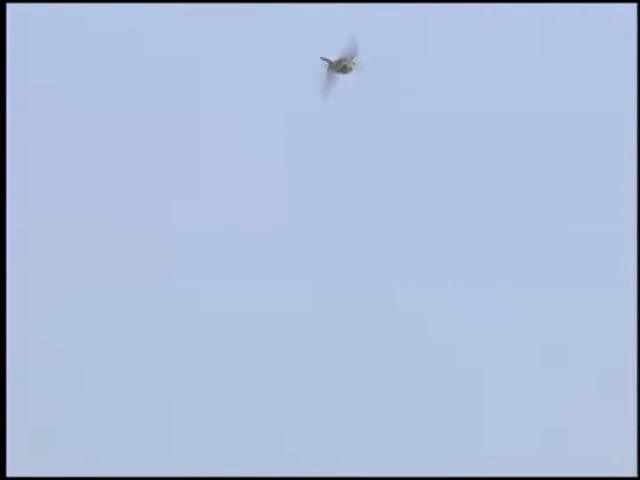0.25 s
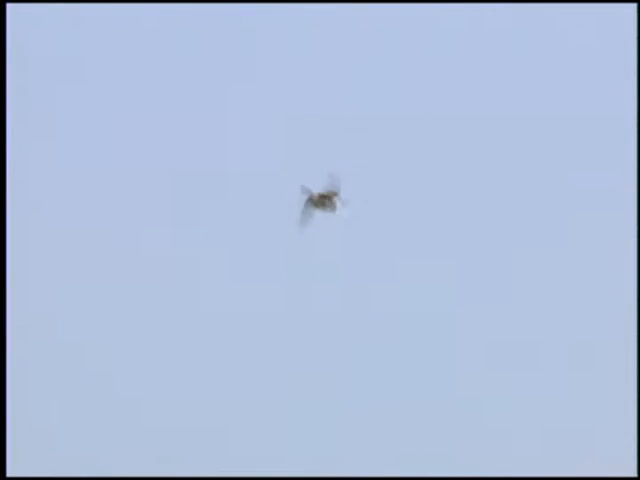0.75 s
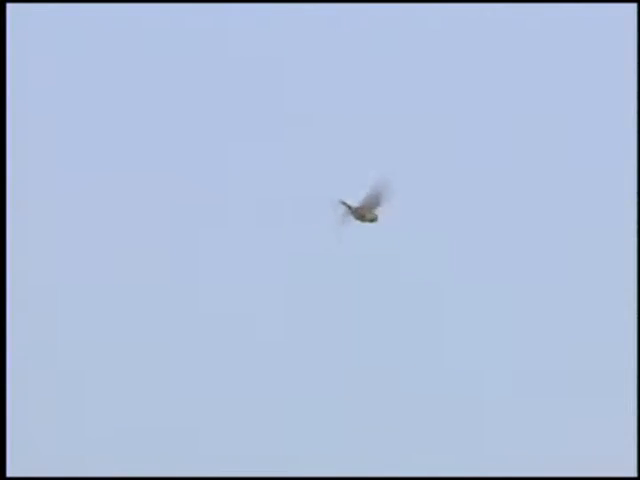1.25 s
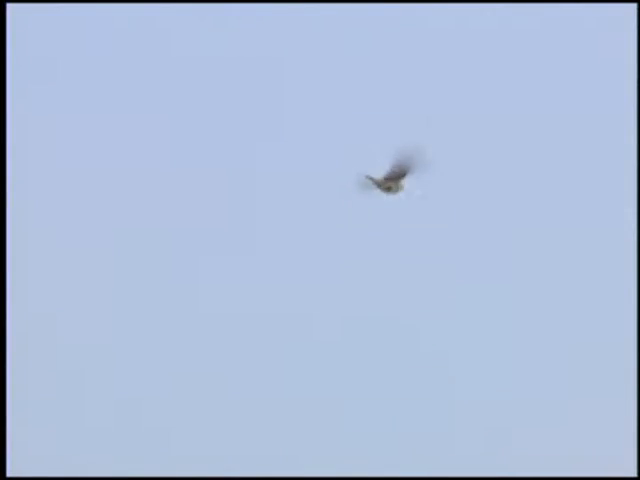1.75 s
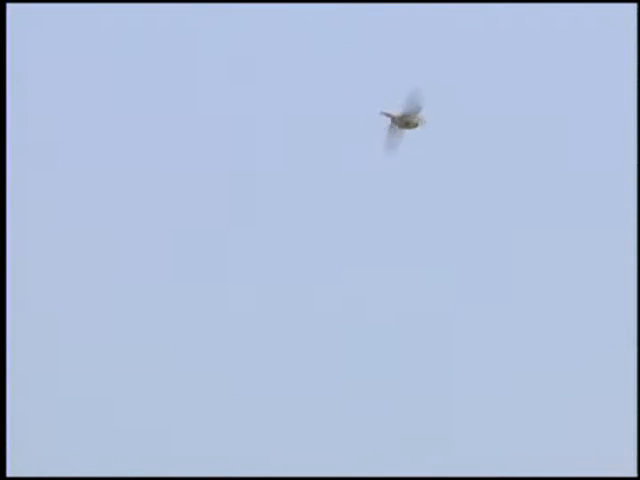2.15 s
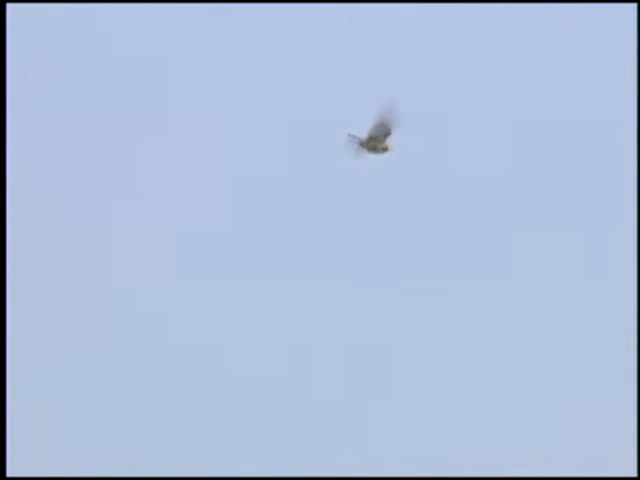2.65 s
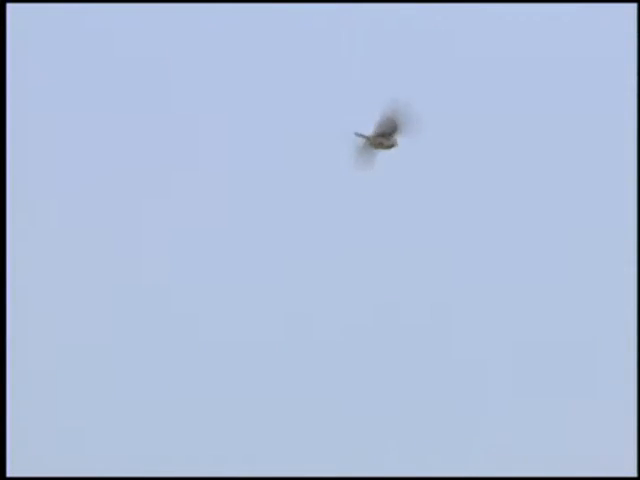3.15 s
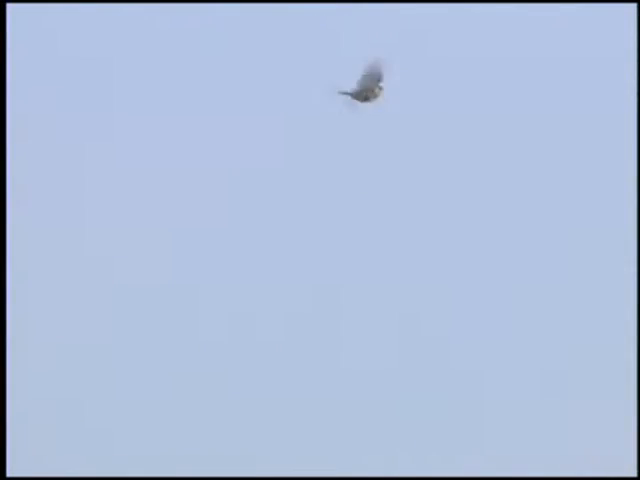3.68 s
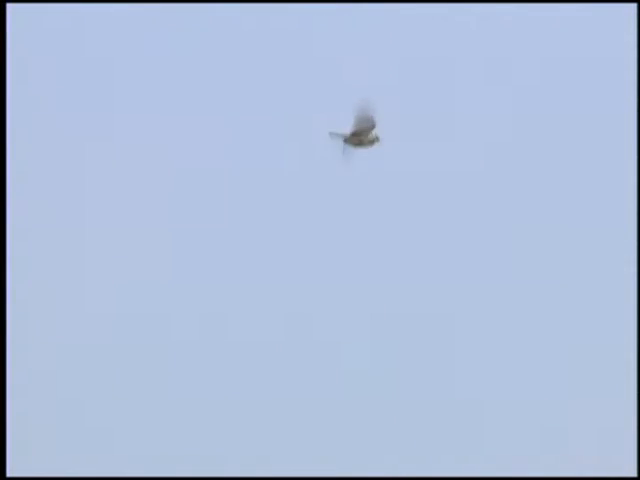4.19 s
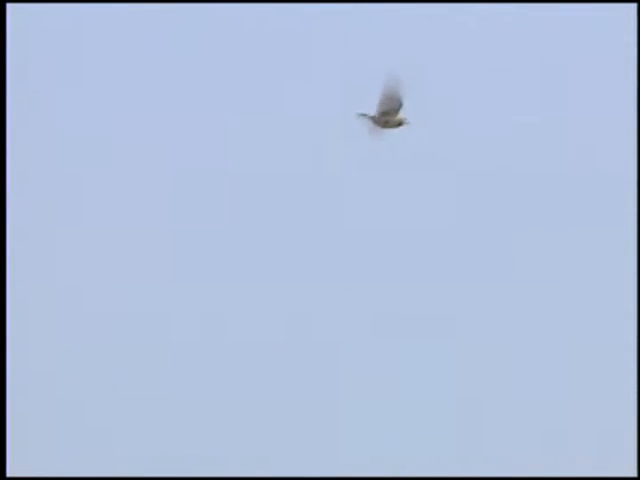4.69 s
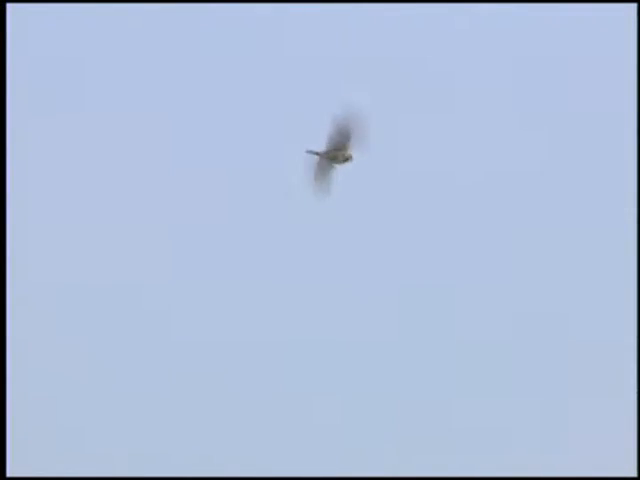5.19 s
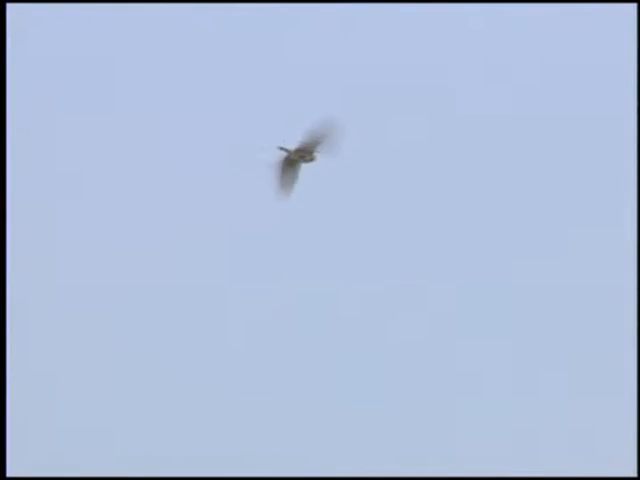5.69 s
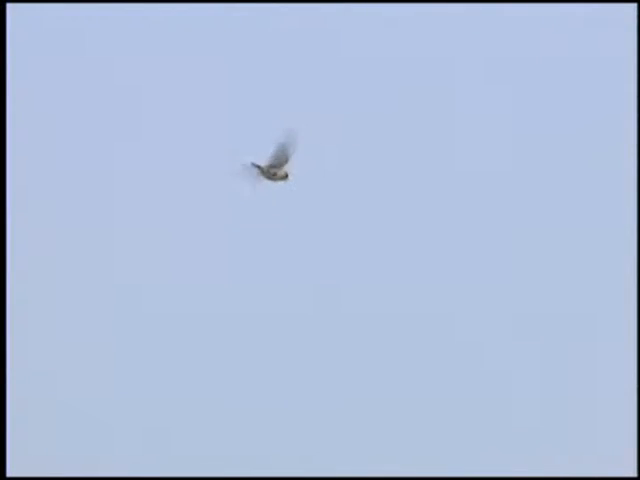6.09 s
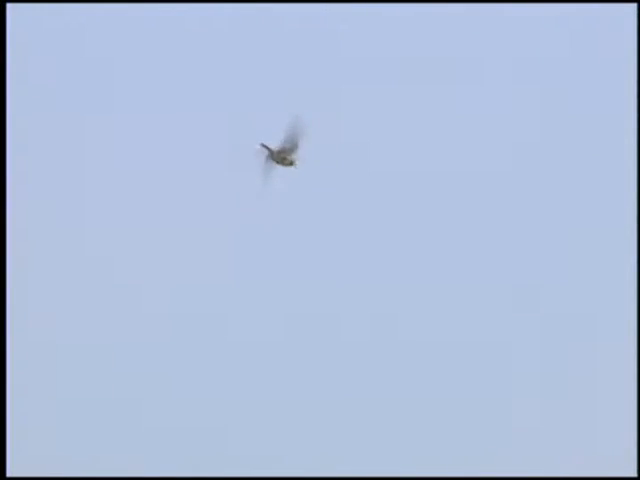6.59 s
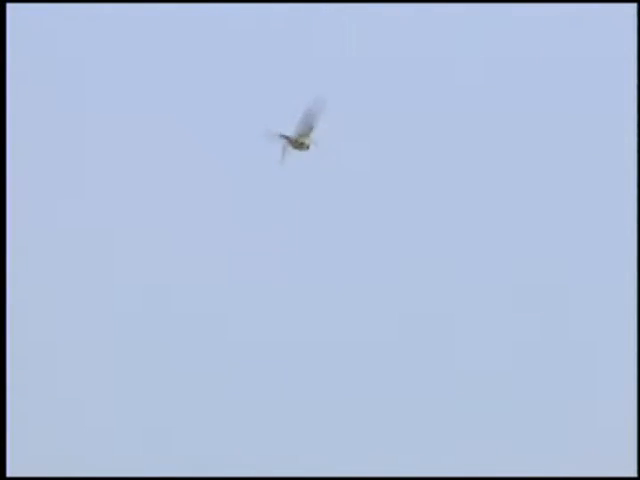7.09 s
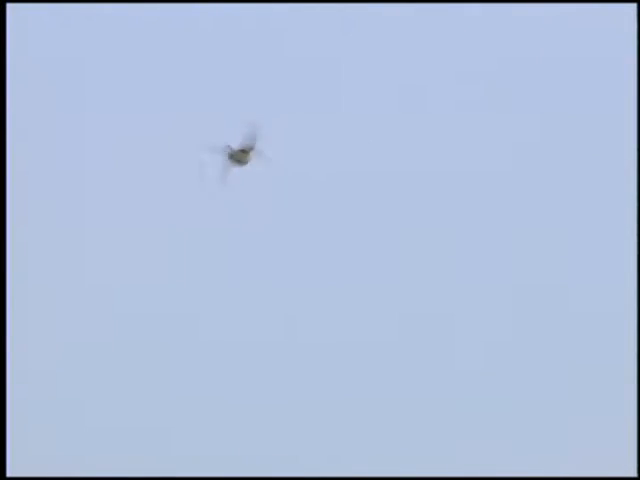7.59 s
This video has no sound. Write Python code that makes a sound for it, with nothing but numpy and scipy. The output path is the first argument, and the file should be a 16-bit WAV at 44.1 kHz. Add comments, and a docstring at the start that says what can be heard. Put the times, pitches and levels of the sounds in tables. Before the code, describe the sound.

A skylark sings as it flies over open fields. It opens with two high, whistled twitters, then repeats one quick phrase of falling swoops, chips and a buzzy trill, swelling and fading a little. Low wind rumbles on the microphone, gusting hardest just past the middle. Faint distant birds chirp and whistle, soft rustles come from close by, and a thin, faint camera whine runs underneath.

```python
"""From the start, wind rumbles on the microphone, a camera whines thinly and birds call far off.
A skylark, flying over open fields, whistles two twitters while soft rustles begin close by.
From about 2 s it repeats one phrase of swoops, chips and a buzz, which is a very fast trill.
A faint hum swells and fades midway, and the wind gusts hard near 5 s. Toward the end a distant
bird gives three arching whistles while the lark sings on."""
import sys
import numpy as np
from scipy import signal
from scipy.fft import rfft, irfft
from scipy.io import wavfile
from scipy.ndimage import uniform_filter1d

SR = 44100
rng = np.random.default_rng(int(sys.argv[2]) if len(sys.argv) > 2 else 0)


def generate_wav(signal):
    """Clip the signal to [-1, 1] and save it as 16-bit WAV at the path in sys.argv[1]."""
    frames = np.transpose(np.atleast_2d(signal))
    scaled = np.clip(frames, -1, 1) * 32767
    pcm = np.round(scaled).astype(np.int16)
    wavfile.write(sys.argv[1], SR, pcm)


N = 345744
TIME = np.arange(N) / SR

# Levels in the tables are relative: the functions turn them up or down.
# Tones of the camera's whine and of the distant hum: pitch_hz, level_db
WHINE_TONES = [(7865, -103), (15202, -115), (15725, -88)]
HUM_TONE = [(753.7, -83)]
# Strength of the gusts on the microphone and of the breeze over the fields: time_s, level_db
GUSTS = [(0.0, -35), (0.08, -45.5), (0.81, -40), (1.18, -52), (1.22, -42), (1.29, -48.5), (1.4, -36),
         (1.46, -48), (1.81, -42.5), (1.83, -40), (2.16, -49), (3.78, -53), (4.02, -44.5), (4.17, -53),
         (4.23, -44), (4.65, -44), (4.76, -34), (4.95, -43.5), (5.0, -31), (5.17, -45), (5.57, -40.5),
         (5.63, -47.5), (5.7, -34), (5.76, -39.5), (6.72, -35), (6.94, -46), (7.21, -39), (7.62, -41.5),
         (7.75, -34), (7.84, -37)]
BREEZE = [(0.0, -70.5), (0.87, -71), (1.07, -73), (2.05, -69), (6.94, -69.5), (7.44, -66), (7.84, -71)]
# Bass-to-treble balance of big air swirls, small swirls, breeze and rustles: frequency_hz, level_db
RUMBLE_COLOUR = [(12, -10.5), (25, 1), (40, 0), (70, -3.5), (100, -7), (140, -22), (200, -30.5),
                 (300, -41.5), (600, -85.5), (2000, -140)]
FLUTTER_COLOUR = [(40, -9), (110, 4.5), (150, 0.5), (200, -7), (260, -17), (400, -27), (2000, -100)]
BREEZE_COLOUR = [(80, -4), (180, 9), (300, 6), (450, 4), (750, -1), (1000, -5), (1500, -10.5),
                 (2200, -18.5), (4000, -25), (7000, -35), (12000, -55.5)]
RUSTLE_COLOUR = [(300, -7), (650, 7), (1000, 2.5), (1500, 2.5), (2200, -1.5), (2700, -3.5), (3500, -13),
                 (7000, -35), (12000, -62.5)]
# Soft rustles nearby: start_s, level_db, rise_s, fade_s (time to drop by 60 dB)
RUSTLES = [(0.76, -65, .0044, 0.079), (.996, -67.5, .003, 0.12), (1.195, -68.5, .003, 0.11),
           (1.45, -71.5, .006, .17), (2.140, -67, 0.013, 0.18), (3.101, -65, 0.014, 0.47),
           (3.558, -60, 0.0068, 0.34), (5.069, -69, 0.008, 0.24), (5.380, -67, 0.023, 0.17),
           (5.973, -66.5, .006, 0.54), (6.461, -65, .009, 0.37)]

# How each kind of bird note glides: progress (0 to 1), pitch_hz, level_db
RISE_SHAPE = [(0, 5360, -7.5), (.35, 5510, -2), (0.698, 6100, -4), (1, 6850, -5.5)]
SWOOP_SHAPE = [(0, 7110, -20), (0.099, 6560, -10.5), (0.352, 5465, -3), (.55, 4700, -3.5),
               (0.749, 4200, 1.5), (.92, 3850, 0.5), (1.001, 3820, -11.5)]
PEAK_SHAPE = [(0, 4100, -14), (.2, 4800, -6), (.42, 5330, -6), (.57, 4500, -1), (.8, 4020, 1),
              (1, 3880, -3)]
CHIP_SHAPE = [(0, 3000, -8), (.5, 3100, 1), (1, 2830, -9.5)]
CHURR_SHAPE = [(0, 3530, 1), (.3, 3520, 3), (.48, 3440, 1.5), (.53, 3210, 1.5), (.62, 3130, 1),
               (.67, 2620, -8), (.8, 2470, -8), (1, 2050, -15)]
FLICK_SHAPE = [(0, 5700, -7), (.25, 5080, 2.5), (.6, 4780, 1), (1, 3750, 5)]
BUZZ_SHAPE = [(0, 5450, -7), (.04, 4950, -1), (.11, 4700, -2), (.25, 4540, -.5), (.55, 4500, 0),
              (.85, 4380, -.5), (.94, 4400, -4), (1, 4400, -14)]
SLUR_SHAPE = [(0, 5000, -23), (.08, 5550, -15), (.15, 7200, -28), (.21, 5600, -14), (.3, 5200, -9.5),
              (.42, 4930, -10), (.51, 4400, -7), (.59, 3680, -4), (.72, 3430, -5), (.93, 3390, -7),
              (1, 3420, -20)]
TWEET_SHAPE = [(0, 3210, -4), (.25, 4320, -0.5), (.33, 4360, -13), (.42, 4540, 4), (0.701, 4000, 1),
               (1, 3420, 3.5)]
LILT_SHAPE = [(0, 2960, -14.5), (.25, 3100, -7.5), (.55, 3700, -0.5), (.67, 3140, -11), (0.751, 3190, -35),
              (.87, 3810, 0), (1, 3720, 7)]
PURR_SHAPE = [(0, 2880, -12), (.45, 2900, -2), (1, 2670, -8)]
RATTLE_SHAPE = [(0, 4550, -3), (.15, 4210, -6), (.6, 4110, -4), (1, 3970, -9)]
JINGLE_SHAPE = [(0, 4590, -9), (.2, 4890, -1), (0.701, 4540, -1), (.85, 4670, 3.5), (1, 4495, -23)]
WHISTLE_SHAPE = [(0, 3300, -8), (.3, 4000, -3), (.55, 4290, 0), (.8, 4370, 0), (1, 4320, -3)]
FALL_SHAPE = [(0, 4600, -5), (0.249, 4880, 0.5), (.6, 4480, -1.5), (1, 3970, -5)]
BOW_SHAPE = [(0, 3100, -1), (.25, 3300, -1), (.48, 3430, 4), (.65, 3100, 4), (1, 2620, -11)]
# Figures, the quick wiggles that repeat in a trill: progress (0 to 1), pitch_offset_hz, level_db
PLAIN = [(0, 0, 1), (1, 0.0049, -4)]
ARCH = [(0, -480, -3), (.2, 0, 0), (.5, 210, 0), (.8, 0, 0), (1, -480, -3)]
ZIGZAG = [(0, -1000, -7), (.09, -650, -5), (.22, 740, -6), (.35, 50, -.5), (.64, -30, .5), (.78, 380, -2.5),
          (.92, -620, -5), (1, -1000, -7)]
HORNS = [(0, -800, -12), (.15, 600, -3), (.3, -100, -3), (.55, -350, -2), (.7, 50, -1), (.85, 850, 0),
         (1, -800, -12)]

# Rising whistles and falling calls of distant birds: start_s, level_db, length_s, pitch_factor
FAR_WHISTLES = [(.15, -89, .13, 1.29), (.488, -84, 0.077, 0.94), (.755, -79, .08, .99),
                (1.68, -83, .04, 1.15)]
FAR_CALLS = [(1.345, -83, 0.026, 0.86), (1.722, -82, .028, 1.18), (3.742, -72, 0.011, 1.03),
             (4.718, -76, 0.018, 1.05), (4.80, -74.5, 0.014, 0.59), (4.918, -79, .014, .87),
             (4.938, -78, .016, .95), (5.425, -77.5, .014, 0.73), (5.90, -80, 0.018, 0.91)]
# The lark's notes by name: shape, figure, count (of wiggles), slowing, swing (wiggle size factor)
LARK_NOTES = { "rise": dict(shape=RISE_SHAPE), "swoop": dict(shape=SWOOP_SHAPE),
              "peak": dict(shape=PEAK_SHAPE), "flick": dict(shape=FLICK_SHAPE),
              "tweet": dict(shape=TWEET_SHAPE), "lilt": dict(shape=LILT_SHAPE),
              "slur": dict(shape=SLUR_SHAPE), "whistle": dict(shape=WHISTLE_SHAPE),
              "chip": dict(shape=CHIP_SHAPE, figure=ARCH),
              "stutter": dict(shape=CHIP_SHAPE, figure=ARCH, count=3.3),
              "purr": dict(shape=PURR_SHAPE, figure=ARCH, count=6.7),
              "churr": dict(shape=CHURR_SHAPE, figure=ARCH, count=8),
              "rattle": dict(shape=RATTLE_SHAPE, figure=ZIGZAG, count=6.6, swing=0.88),
              "jingle": dict(shape=JINGLE_SHAPE, figure=HORNS, count=6),
              "buzz": dict(shape=BUZZ_SHAPE, figure=ZIGZAG, count=17, slowing=0.13)}
# The lark's three tunes: offset_s, note_name, level_db, length_s, pitch_factor
TWITTER = [(-.058, "purr", -69.5, 0.057, 0.98), (0, "tweet", -68, 0.034, 0.98),
           (.07, "whistle", -76, 0.014, .61), (.136, "lilt", -67, 0.053, 0.99),
           (.197, "flick", -76.5, 0.0078, 0.59), (.243, "flick", -75, .016, .91),
           (.266, "rattle", -64.5, .06, 1), (.329, "jingle", -69.5, 0.094, 0.98),
           (.469, "slur", -55.5, 0.11, 0.98), (.623, "slur", -55, 0.11, 1)]
LINK = [(.829, "stutter", -69.5, 0.03, 0.96), (.865, "stutter", -70.5, 0.022, 1),
        (.924, "tweet", -71.5, 0.031, 1), (.957, "whistle", -70, 0.025, .71),
        (.982, "tweet", -70, .025, .87), (1.01, "flick", -79, 0.0076, .55)]
PHRASE = [(-.033, "rise", -67, .02, 1), (0, "swoop", -62, 0.063, 0.99), (.098, "rise", -67, .02, 1),
          (.1315, "swoop", -61.5, .062, 1), (.232, "peak", -60.5, .03, 1),
          (.2705, "chip", -64.5, .009, 0.98), (.29, "chip", -62.5, .009, 1), (.309, "churr", -65, .053, 1),
          (.4085, "flick", -69.5, .015, 1)]
# Each time the twitter is sung: start_s, stretch_factor (above 1 spreads the notes out)
TWITTER_REPEATS = [(.050, 1.0), (1.135, .99)]
# Each time the main phrase is sung: start_s, stretch_factor, buzz_length_s, buzz_pitch_factor
PHRASE_REPEATS = [(1.938, 1, .18, 1), (2.66, 0.98, .18, 1), (3.3702, 1.003, .18, 1), (4.085, 1, 0.2, 0.99),
                  (4.814, 0.99, 0.19, 1), (5.531, 1.034, 0.18, 0.99), (6.271, 1.008, .193, 0.99),
                  (7.006, 1.018, 0.2, 0.97), (7.751, 1, .19, 0.96)]
# The song swells and fades as the lark turns in flight: time_s, level_db
SONG_LOUDNESS = [(0, 2), (.7, 1.5), (1.1, -0.5), (1.8, -1.5), (2.3, 0), (3.4, .5), (3.9, -2), (4.9, 2.5),
                 (5.35, 0), (5.67, -6), (6.05, -6), (6.3, -1.5), (6.55, -3), (6.95, -2), (7.2, 0),
                 (7.8, -2.5)]


def gain_of(db):
    """Turns decibels into a number to multiply a sound by."""
    return 10 ** (np.asarray(db) / 20)


def evened(x):
    """Scales a signal so that its average power is 1."""
    return x / np.sqrt(np.mean(x ** 2) + 1e-20)


def along(rows, at):
    """Looks up places in a table's first column and reads the others, blending between rows."""
    place, *columns = np.transpose(rows)
    return [np.interp(at, np.sort(place), column) for column in columns]


def add(mix, start_s, sound):
    """Mixes a sound in at the given time, cutting off what falls outside."""
    at = round(start_s * SR)
    sound = sound[max(-at, 0):]
    part = mix[max(at, 0):][:len(sound)]
    part += sound[:len(part)]


def noise(colour):
    """Noise with the bass-to-treble balance of a colour table."""
    hz, db = np.transpose(colour)
    balance_db = np.interp(np.log(np.fft.rfftfreq(N, 1 / SR) + 1), np.log(hz + 1), db)
    return evened(irfft(rfft(rng.standard_normal(N)) * gain_of(balance_db), N))


def wander(samples, rate_hz):
    """A smooth random wobble about 1 in size; a higher rate makes it quicker."""
    padded = samples + SR // 4
    keep_slow = np.exp(-(np.fft.rfftfreq(padded, 1 / SR) / rate_hz) ** 2)
    return evened(irfft(rfft(rng.standard_normal(padded)) * keep_slow))[:samples]


def camera_whine(boost_db=4.5, drift=.0007, growth_db_per_s=0.43):
    """The camera's electronics give off thin, unsteady tones that slowly grow louder."""
    clock = TIME + np.cumsum(drift * wander(N, 27)) / SR
    tones = sum(gain_of(db) * np.sin(2 * np.pi * hz * clock) for hz, db in WHINE_TONES)
    waver = 1 + .18 * wander(N, 25)
    return gain_of(boost_db + growth_db_per_s * TIME) * tones * waver


def far_hum(boost_db=1.5, peak_s=3.4, width_s=1.4, drift_hz=7):
    """A faint, wavering hum drifts in from far away and fades."""
    hz, db = HUM_TONE[0]
    tone = np.sin(2 * np.pi * np.cumsum(hz + drift_hz * wander(N, 15)) / SR)
    waver_db = 2.5 * wander(N, 8)
    swell = np.exp(-.5 * ((TIME - peak_s) / width_s) ** 2)
    return tone * gain_of(db + boost_db + waver_db) * swell


def wind(flutter_db=-55, flutter_growth=1.275, breeze_boost_db=1, hiss_db=-89):
    """Swirls of air beat on the microphone; the open field adds a soft rush under a thin hiss."""
    gust_db = along(GUSTS, TIME)[0] + 1.4 * wander(N, 25)
    swirls = noise(RUMBLE_COLOUR)
    swirls /= np.sqrt(uniform_filter1d(swirls ** 2, size=5000))  # only the gusts set the slow swell
    rumble = swirls * gain_of(gust_db)
    # Strong, lasting gusts stir up small swirls, which sound brighter.
    lasting_db = uniform_filter1d(gust_db, size=SR // 4) - np.median(gust_db)
    flutter = noise(FLUTTER_COLOUR) * gain_of(flutter_db + flutter_growth * lasting_db)
    breeze_db = along(BREEZE, TIME)[0] + breeze_boost_db
    breeze = noise(BREEZE_COLOUR) * gain_of(breeze_db + 1.94 * wander(N, 13))
    return rumble + flutter + breeze + gain_of(hiss_db) * rng.standard_normal(N)


def rustles():
    """Something rustles close by: soft, grainy bursts of noise that swell and die away."""
    swell = np.zeros(N)
    t = TIME[:SR // 2]
    for start_s, db, rise_s, fade_s in RUSTLES:
        drop_db = 60 * np.maximum(t - rise_s, 0) / fade_s
        add(swell, start_s, np.minimum(t / rise_s, 1) * gain_of(db - drop_db))
    grain = gain_of(2.2 * wander(N, 300))
    return swell * evened(noise(RUSTLE_COLOUR) * grain)


def grass_scatter(sound, fade_s=0.41, tail_db=-17, treble_db_per_octave=9):
    """Grass throws back a weak, blurred echo; its thin blades scatter high notes best."""
    t = TIME[:SR // 2]
    onset = 1 - np.exp(-t / 0.0023)
    tail = rng.standard_normal(len(t)) * gain_of(-60 * t / fade_s) * onset
    octaves = np.log2(np.clip(np.fft.rfftfreq(len(t), 1 / SR), 2000, 7000) / 4500)
    tail = irfft(rfft(evened(tail)) * gain_of(tail_db + treble_db_per_octave * octaves), len(t))
    return signal.fftconvolve(sound, tail / np.sqrt(len(t)))[:N]


def ground_bounce(sound, delay_s=0.0082, echo_db=-19):
    """The soil returns one weak echo, which makes gliding notes ripple when mixed with them."""
    return gain_of(echo_db) * np.interp(TIME - delay_s, TIME, sound, left=0)


def bird_note(shape, db, length_s, pitch_factor=1, figure=PLAIN, count=1, slowing=0, swing=1):
    """A nearly pure tone glides along a shape; in a trill, a quick wiggle repeats on top."""
    progress = np.linspace(0, 1, max(int(length_s * SR), 64))
    samples = len(progress)
    glide_hz, glide_db = along(shape, progress)
    cycles = count * (progress + slowing * progress * (1 - progress))
    place_in_cycle = (cycles + .035 * wander(samples, 120)) % 1
    wiggle_hz, wiggle_db = uniform_filter1d(along(figure, place_in_cycle), size=20, axis=1)
    depth = np.clip(2 * cycles - .5, 0, 1) if figure is ZIGZAG else 1  # a buzz starts as a plain note
    hz = pitch_factor * glide_hz + depth * swing * wiggle_hz
    unsteady = 1 + .005 * wander(samples, 400)
    phase = 2 * np.pi * np.cumsum(hz * unsteady) / SR
    tone = np.sin(phase) + gain_of(-42) * np.sin(2 * phase)  # a faint overtone, one octave up
    from_edge_s = np.minimum(progress, 1 - progress) * length_s
    fades = np.sin(np.pi / 2 * np.clip(from_edge_s / .0018, 0, 1)) ** 2  # soft ends do not click
    flicker_db = 1.63 * wander(samples, 160)
    return np.sqrt(2) * tone * fades * gain_of(db + glide_db + depth * wiggle_db + flicker_db)


def far_birds(chirps=70, chirp_db=-87, spread_db=3):
    """Distant birds whistle and call at set times, with faint random chirps in between."""
    out = np.zeros(N)
    bows = [(6.83 + k * .381, -83.5, .125) for k in range(3)]  # arching whistles: start_s, db, length_s
    for calls, shape in [(FAR_WHISTLES, WHISTLE_SHAPE), (FAR_CALLS, FALL_SHAPE), (bows, BOW_SHAPE)]:
        for start_s, *settings in calls:
            add(out, start_s, bird_note(shape, *settings))
    shapes = [FALL_SHAPE, PEAK_SHAPE, TWEET_SHAPE, WHISTLE_SHAPE, LILT_SHAPE]
    for k, (when, loud, long, high) in enumerate(rng.random((chirps, 4))):
        shape = shapes[k % len(shapes)]
        db = chirp_db + spread_db * (2 * loud - 1)
        chirp = bird_note(shape, db, length_s=.011 + .025 * long, pitch_factor=.8 + .32 * high)
        add(out, when * N / SR, chirp)
    return out


def lark_tune(tune, start_s=0, stretch=1):
    """The lark sings a tune's notes in order; stretch changes their spacing, not their length."""
    out = np.zeros(N)
    for offset_s, name, db, length_s, pitch_factor in tune:
        note = bird_note(db=db, length_s=length_s, pitch_factor=pitch_factor, **LARK_NOTES[name])
        add(out, start_s + stretch * offset_s, note)
    return out


def skylark(buzz_offset_s=0.431, buzz_db=-62):
    """The lark sings two linked twitters, then its main phrase and closing buzz over and over."""
    song = lark_tune(LINK) + sum(lark_tune(TWITTER, *repeat) for repeat in TWITTER_REPEATS)
    for start_s, stretch, buzz_length_s, buzz_pitch_factor in PHRASE_REPEATS:
        buzz = (buzz_offset_s, "buzz", buzz_db, buzz_length_s, buzz_pitch_factor)
        song += lark_tune(PHRASE + [buzz], start_s, stretch)
    return song * gain_of(along(SONG_LOUDNESS, TIME)[0])


def scene():
    """Mixes the birds, their echoes and the background into one channel."""
    birds = skylark() + far_birds()
    birds_with_echoes = birds + ground_bounce(birds) + grass_scatter(birds)
    return (birds_with_echoes + rustles() + wind() + far_hum() + camera_whine())[None]


def record(dry):
    """Cuts away the very highest treble, above 15900 Hz."""
    treble_cut = signal.firwin(1023, 15900, window=("kaiser", 9), fs=SR)
    padded = np.pad(dry[0], len(treble_cut) // 2, mode="edge")
    return signal.oaconvolve(padded, treble_cut, "valid")[None]


dry = scene()
out = record(dry)
generate_wav(out)
```